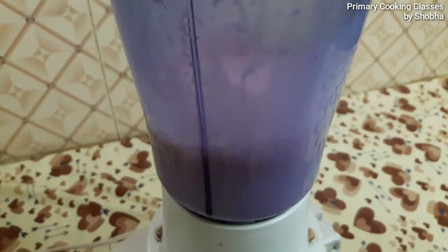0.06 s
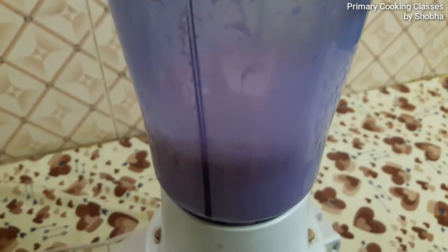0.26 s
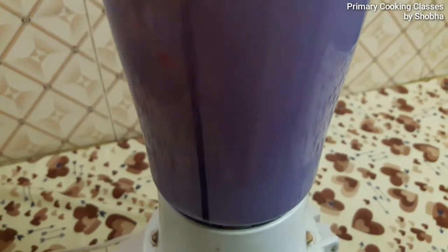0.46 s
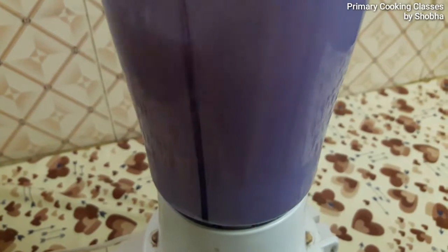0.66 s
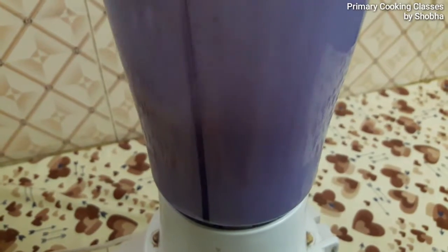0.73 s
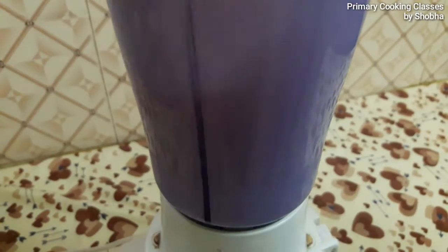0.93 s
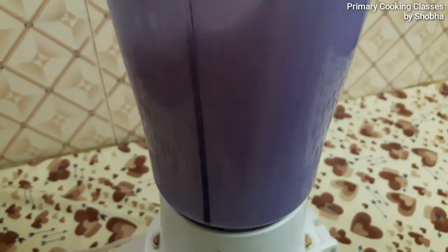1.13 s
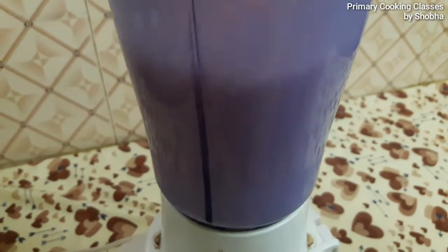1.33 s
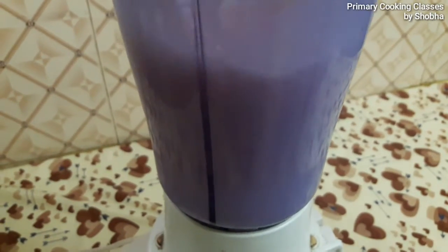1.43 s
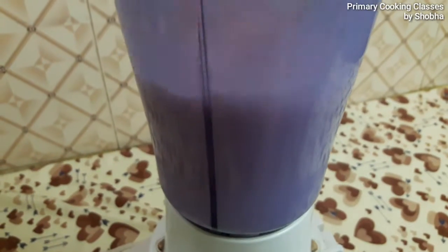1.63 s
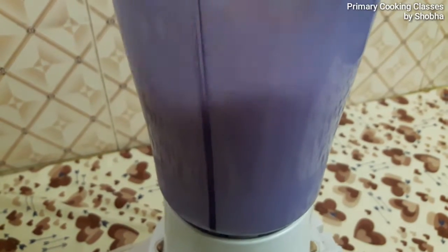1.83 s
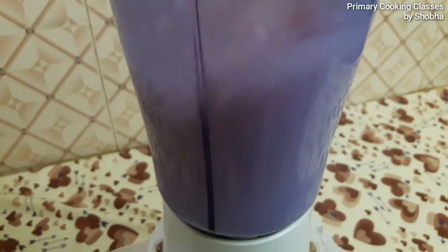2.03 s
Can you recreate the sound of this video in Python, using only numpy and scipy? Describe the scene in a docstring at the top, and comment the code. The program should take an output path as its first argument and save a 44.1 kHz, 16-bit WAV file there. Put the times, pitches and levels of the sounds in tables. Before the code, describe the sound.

A kitchen blender clicks on, spins up fast and churns ice and liquid with a rattling roar

```python
"""The fading tail of an earlier sound and a few switch clicks start a kitchen blender in a tiled room.
The clicks and the cracking ice are bursts of coloured noise; the gulps and knocks are short swelling tones.
The churning is a dense rain of small impacts and a plastic jar rung by random strikes, over sloshing liquid.
The motor runs up to speed: it whirrs (rough clicks), whines and hums (tones that follow the shaft speed).
Noise tails give the room its reflections, and a quiet steady noise lies behind everything."""
import sys
import numpy as np
from scipy import signal
from scipy.fft import rfft, irfft
from scipy.io import wavfile

SR = 44100
rng = np.random.default_rng(int(sys.argv[2]) if len(sys.argv) > 2 else 0)


def bounce(signal):
    """Save signal as a 16-bit WAV file at the path given by the first command-line argument."""
    frames = np.transpose(np.atleast_2d(signal))
    limited = np.clip(frames, -1, 1)
    pcm = np.round(limited * 32767).astype(np.int16)
    wavfile.write(sys.argv[1], SR, pcm)


N = 92169
TIME = np.arange(N) / SR


def from_db(db):
    """Turn decibels into a gain."""
    return 10 ** (np.asarray(db) / 20)


def rms_one(x):
    """Scale to an average strength (rms) of 1."""
    return x / np.sqrt(np.mean(x ** 2) + 1e-20)


def in_time(rows):
    """Draw one curve over time for each column after the first, which holds the seconds."""
    seconds, *columns = np.transpose(rows)
    return [np.interp(TIME, seconds, column) for column in columns]


def at_hz(points, hz):
    """Read a table between its points, on a log-frequency axis."""
    table_hz, value = np.transpose(points)
    return np.interp(np.log(np.maximum(hz, 1)), np.log(table_hz), value)


def colour(x, spectrum, tilt_db=0, size=4096):
    """Filter with the given spectrum, never sounding early; white noise keeps its power."""
    hz = np.arange(size // 2 + 1) * SR / size
    tilt = tilt_db * np.log2(np.maximum(hz, 1000) / 1000)  # dB per octave above 1000 Hz
    gain = rms_one(from_db(at_hz(spectrum, hz) + tilt))
    # folding the cepstrum forward gives the minimum-phase filter
    cepstrum = irfft(np.log(gain))
    cepstrum[1:size // 2] *= 2
    cepstrum[size // 2 + 1:] = 0
    impulse = irfft(np.exp(rfft(cepstrum)))
    return signal.fftconvolve(x, impulse)[:N]


def resonate(x, modes):
    """Sum of resonances; a narrower one rings longer, and each has its own rms level."""
    out = 0
    for hz, width, db in modes:
        r = np.exp(-np.pi * width / SR)
        feedback = [1, -2 * r * np.cos(2 * np.pi * hz / SR), r * r]
        out = out + from_db(db) * rms_one(signal.lfilter([1, 0, -1], feedback, x))
    return out


def drift(rate_hz):
    """Smooth random wandering with spread 1, computed at every 40th sample."""
    r = np.exp(-80 * np.pi * rate_hz / SR)
    noise = rng.standard_normal(N // 40 + 2002)
    slow = signal.lfilter([1], [1, -2 * r, r * r], noise)[2000:]  # skip the filter's start
    return np.interp(np.arange(N) / 40, np.arange(len(slow)), rms_one(slow))


def grains(per_s, spread_db):
    """Single-sample clicks at random times, of uneven size and either sign; rms 1."""
    sizes = from_db(spread_db * np.minimum(rng.exponential(1, N), 4))
    signs = rng.choice([-1, 1], N)
    return rms_one(sizes * signs * (rng.random(N) < per_s / SR))


def thud(start_s, hz, rise_s):
    """A tone whose envelope swells to height 1 and dies quickly."""
    t = np.maximum(TIME - start_s, 0)
    envelope = (t / rise_s * np.exp(1 - t / rise_s)) ** 2
    return envelope * np.sin(2 * np.pi * hz * t)


def snap(start_s, t60_s):
    """A burst of noise with a sharp front that falls 60 dB in t60_s."""
    fall = from_db(-60 * np.clip((TIME - start_s) / t60_s, 0, 2))
    return rng.standard_normal(N) * (TIME >= start_s) * fall


# Tone of the small bits hitting the wall. Each row: frequency in Hz, relative level in dB.
CHURN = [(150, -32.5), (480, -16), (560, -9.5), (900, -4), (1100, -5), (1300, -0.5), (1700, -2.5),
         (2000, -1), (2300, -2), (2900, -12), (4200, -27.5), (16000, -28.5)]
# Ringing of the jar. Each row: frequency in Hz, width in Hz, level against the small bits in dB.
JAR_MODES = [(575, 31, -24), (950, 93, -18.5), (1290, 140, -32), (1463, 31, -15), (1883, 34, -7.5),
             (1920, 52, -8)]
GRAINS_PER_S, GRAIN_SPREAD_DB = 3500, 2.5   # small bits at top speed
KNOCK_RISE_S, SMALL_KNOCKS_PER_S, SMALL_KNOCKS_DB = 0.00066, 110, -7.5
JAR_STRIKES_PER_S = 150


def churning(pace, surge_db=1.16):
    """Small impacts, denser with speed, and scattered lumps sound over a jar rung by separate strikes."""
    bits = grains(GRAINS_PER_S * pace ** 2, GRAIN_SPREAD_DB)
    knock = thud(0, hz=1860, rise_s=KNOCK_RISE_S)
    lumps = signal.fftconvolve(grains(SMALL_KNOCKS_PER_S, spread_db=3.3), knock)[:N]
    wall = colour(bits, CHURN) + from_db(SMALL_KNOCKS_DB) * rms_one(lumps)
    ringing = resonate(grains(JAR_STRIKES_PER_S, spread_db=3.5), JAR_MODES)
    return rms_one(wall + ringing) * from_db(surge_db * drift(49))


# Tone of the whirr. Each row: frequency in Hz, relative level in dB.
WHIRR = [(1500, -21.5), (3200, -1.5), (4300, -7.5), (5000, -4.5), (6000, 1), (7200, 2), (8000, -0.5),
         (8450, 4.5), (9400, -1.5), (10700, 0.5), (13500, -8), (16000, -10.5)]
# Ringing of the motor housing. Each row: frequency in Hz, width in Hz, level against the rasp in dB.
HOUSING_MODES = [(6040, 70, -23), (6450, 90, -20), (7570, 70, -21), (8420, 200, -17), (8790, 80, -21),
                 (9070, 70, -21), (10955, 35, -24)]
WHIRR_PER_S, WHIRR_SPREAD_DB, WHIRR_THROB = 9000, 3, 0.16   # throb: share of the rasp's strength
TICKS_PER_S, TICKS_DB = 69, -16   # small chips of ice


def whirr(turns, flutter_db=1.76):
    """Brushes and blades rasp, throbbing once a turn; chips tick, and steady noise rings the housing."""
    throb = 1 + WHIRR_THROB * np.cos(2 * np.pi * turns)
    rasp = grains(WHIRR_PER_S, WHIRR_SPREAD_DB) * throb * from_db(flutter_db * drift(33))
    ticks = signal.fftconvolve(grains(TICKS_PER_S, spread_db=4.0), snap(0, t60_s=0.01))[:N]
    rough = colour(rasp + from_db(TICKS_DB) * rms_one(ticks), WHIRR)
    return rms_one(rough + resonate(rng.standard_normal(N), HOUSING_MODES))


# Thin whine of the motor. Each row: multiple of the shaft speed, level against the whirr in dB.
WHINE = [(36, -16), (48, -13.5), (60, -19)]
WHINE_WIDTH_HZ = 60


def whine(speed):
    """High, blurred multiples of the shaft speed rise as the motor runs up."""
    turns = np.cumsum(speed) / SR
    total = 0
    for multiple, db in WHINE:
        tone = np.sin(2 * np.pi * round(multiple) * turns)
        total = total + from_db(db) * rms_one(tone * drift(WHINE_WIDTH_HZ))
    return total


# Strength of the hum. Each row: time in seconds, level at the shaft speed in dB,
# level at twice the shaft speed in dB.
HUM = [(.4, -49, -51), (.53, -49, -31.5), (.62, -43, -36.5), (.78, -40, -47), (.95, -48.5, -33.5),
       (1.15, -45, -47), (1.35, -46, -44), (1.6, -58, -41), (1.76, -42, -45), (1.95, -52, -45),
       (2.09, -41, -43)]
HUM_WAVER_DB = 3


def hum(turns):
    """The shaft and its two blades hum, wavering under the shifting load."""
    total = 0
    for multiple, db in enumerate(in_time(HUM), 1):
        waver = from_db(HUM_WAVER_DB * drift(8.4))
        total = total + from_db(db) * rms_one(np.sin(2 * np.pi * multiple * turns) * waver)
    return total


# Tone of the liquid. Each row: frequency in Hz, relative level in dB.
SLOSH = [(25, -28), (60, -24), (80, -15), (125, -10.5), (165, 1), (225, -5), (335, 5), (420, -2.5),
         (500, -2.5), (900, -8.5), (4000, -79)]


def sloshing(surge_db=2):
    """The liquid rumbles in uneven surges of low noise."""
    return colour(rng.standard_normal(N), SLOSH) * from_db(surge_db * drift(10.5))


# Big lumps knock on the jar. Each row: start in seconds, level in dB, frequency in Hz.
KNOCKS = [(0.3364, -5.5, 2250), (0.3395, -11.5, 1570), (0.3601, -14, 1900), (.378, -20, 1940),
          (.396, -20, 1820), (.4345, -7, 1410), (0.4531, -10, 1836), (0.458, -8, 1420), (.498, -9, 1850),
          (0.6645, -1, 1670), (0.7149, -6, 2110), (.8700, -6, 1770), (0.8772, -2, 1700), (.8782, -8, 2020),
          (1.058, -2, 1750), (1.2842, -11.5, 1750), (1.3937, -10, 1780), (1.497, -7.5, 1900),
          (2.0002, -10, 1930), (2.0555, -10, 1900)]
# Ice cracks on the blades. Each row: start in seconds, level in dB, brightness in dB per octave.
CRACKS = [(0.3366, -29.5, 3), (.3432, -24, 0), (0.361, -18.5, -5), (.377, -27, 8), (0.4102, -21, -6),
          (0.454, -18, -2), (.472, -21, -1), (0.502, -22, 3), (.5135, -16.5, 6), (0.6426, -20, 0),
          (.831, -17, -6), (0.996, -15, 8), (1.099, -18.5, -4), (1.336, -19, -1), (1.499, -18.5, 15),
          (1.7562, -17.5, -6.5)]
# Tone of a crack. Each row: frequency in Hz, relative level in dB.
CRACK = [(150, -46), (1500, -10), (4000, -1.5), (7000, 7.5), (9000, 6), (13000, -5), (16000, -14)]
CRACK_T60_S = 0.02
JAR_RING_HZ, JAR_RING_RISE_S, JAR_RING_DB = 1867, 0.0025, -13   # ring level is against the knock


def ice():
    """Big lumps knock on the wall, which rings on briefly, or crack on the blades."""
    total = 0
    for start_s, db, hz in KNOCKS:
        ring = from_db(JAR_RING_DB) * thud(start_s, JAR_RING_HZ, JAR_RING_RISE_S)
        total = total + from_db(db) * (thud(start_s, hz, KNOCK_RISE_S) + ring)
    for start_s, db, tilt in CRACKS:
        total = total + from_db(db) * colour(snap(start_s, CRACK_T60_S), CRACK, tilt)
    return total


# Air pockets gulp as the liquid is thrown up. Each row: start in seconds, level in dB, frequency in Hz.
GULPS = [(0.34, -19.5, 282.3), (0.3624, -13, 406), (0.3812, -12.5, 383), (.444, -18, 313), (.455, -14, 304),
         (.472, -17, 598), (0.475, -20, 333)]
GULP_RISE_S = 0.0039


def gulps():
    """Air pockets ring low as the vortex opens."""
    return sum(from_db(db) * thud(start_s, hz, GULP_RISE_S) for start_s, db, hz in GULPS)


# Switch clicks; the first row is the fading tail of an earlier sound. Each row: start in seconds,
# level in dB, brightness in dB per octave, time to fall 60 dB in seconds.
CLICKS = [(0, -33, -2.5, 0.15), (.004, -26, 3, 0.016), (0.032, -19, -9.5, 0.023), (0.034, -10, -1, .02),
          (0.0483, -26, 0, .02), (0.0929, -15.5, 13, 0.0076), (.189, -41, -6.5, 0.033),
          (0.2383, -41.5, 7, 0.11)]
# Tone of the switch. Each row: frequency in Hz, relative level in dB.
SWITCH = [(100, -26.5), (400, -5.5), (800, -11.5), (1250, -2), (2000, 1), (3500, -2.5), (4200, -5.5),
          (5700, -5.5), (6600, 0.5), (7300, 0.5), (7900, -10), (8600, -4.5), (9300, -6.5), (12000, -18.5),
          (16000, -30)]


def switch():
    """A fading tail, then plastic clicks: noise bursts, some dull and some bright."""
    total = 0
    for start_s, db, tilt, t60_s in CLICKS:
        total = total + from_db(db) * colour(snap(start_s, t60_s), SWITCH, tilt)
    return total


# How the kitchen rings. Each row: frequency in Hz, time to fall 60 dB in seconds,
# relative level of the reflections in dB.
ROOM = [(150, 0.61, 2), (1000, 0.43, -1), (2970, 0.42, 0.5), (7000, .3, -4), (14000, 0.22, -1.5)]
ROOM_DELAY_S = 0.0046


def reflections(x):
    """One diffuse tail of noise bands; the treble is weaker and dies first."""
    t, tail = TIME[:SR * 2 // 3], 0
    edges = np.geomspace(60, 18000, 11)
    for low, high in zip(edges, edges[1:]):
        t60_s, db = (at_hz(np.array(ROOM)[:, [0, k]], np.sqrt(low * high)) for k in (1, 2))
        band_filter = signal.butter(2, [low, high], "band", fs=SR, output="sos")
        band = signal.sosfilt(band_filter, rng.standard_normal(len(t)))
        fall = np.exp(-np.log(1000) * t / t60_s)
        tail = tail + from_db(db) * band * fall * (t > ROOM_DELAY_S)
    return signal.fftconvolve(x, tail / np.linalg.norm(tail))[:N]


ROOM_SHIFT_PER_S = 1.309   # full cycles; the reflections change as the liquid moves


def kitchen(x):
    """The room passes smoothly between two patterns of reflections."""
    angle = 2 * np.pi * ROOM_SHIFT_PER_S * TIME
    return np.cos(angle) * reflections(x) + np.sin(angle) * reflections(x)


# Tone of the background. Each row: frequency in Hz, relative level in dB.
AMBIENCE = [(25, -13), (100, -10), (230, 2.5), (500, -14), (750, -4.5), (1900, -3), (4000, -41),
            (8000, -15), (16000, -41)]
AMBIENCE_DB = -52


def ambience():
    """A quiet, steady background of coloured noise."""
    return from_db(AMBIENCE_DB) * colour(rng.standard_normal(N), AMBIENCE)


# Speed of the shaft. Each row: time in seconds, turns per second.
SPEED = [(.336, 76.6), (.45, 148), (.56, 156), (.8, 173), (.95, 177), (1.25, 181), (1.6, 181), (2.09, 175)]
# Effort of the blender. Each row: time in seconds, level of the churning in dB,
# level of the whirr in dB, level of the sloshing in dB.
EFFORT = [(.34, -28, -43.5, -29.5), (.42, -22, -34, -27.5), (.46, -23.5, -31.5, -29),
          (.52, -23, -32, -43.5), (.68, -22, -32, -33), (.85, -22.5, -27.5, -38), (1.02, -22.5, -29, -39),
          (1.2, -22.5, -30.5, -36.5), (1.35, -22.5, -28.5, -40), (1.58, -23, -30, -35.5),
          (1.75, -22.5, -29.5, -39), (1.97, -20, -25.5, -31), (2.09, -22, -27, -34)]
START_S, ATTACK_S = .336, 0.0067   # the blades start to turn
HUM_JITTER = 0.0598   # random share of the shaft speed, heard in the hum and the throb
BLENDER_ROOM_DB, GULP_ROOM_DB, CLICK_ROOM_DB = -11, -17.5, -6   # how much of each the room gets


def scene():
    """Switch, then the running blender, in the kitchen."""
    speed, = in_time(SPEED)
    churn_db, whirr_db, slosh_db = in_time(EFFORT)
    turns = np.cumsum(speed * (1 + HUM_JITTER * drift(21.1))) / SR
    running = np.clip((TIME - START_S) / ATTACK_S, 0, 1)
    jar = from_db(churn_db) * churning(speed / speed.max()) + from_db(slosh_db) * sloshing()
    motor = from_db(whirr_db) * (whirr(turns) + whine(speed)) + hum(turns)
    blender = running * (motor + jar) + ice()
    air = gulps()
    clicks = switch()
    to_room = from_db(BLENDER_ROOM_DB) * blender
    to_room = to_room + from_db(GULP_ROOM_DB) * air + from_db(CLICK_ROOM_DB) * clicks
    return (blender + air + clicks + kitchen(to_room) + ambience())[None]   # one channel


CUTOFF_HZ = 15550


def record(dry):
    """A low-pass filter cuts the top steeply."""
    low_pass = signal.firwin(301, CUTOFF_HZ, fs=SR, window=("kaiser", 9))
    return signal.fftconvolve(dry, low_pass[None], "same", axes=1)


dry = scene()
out = record(dry)
bounce(out)
```